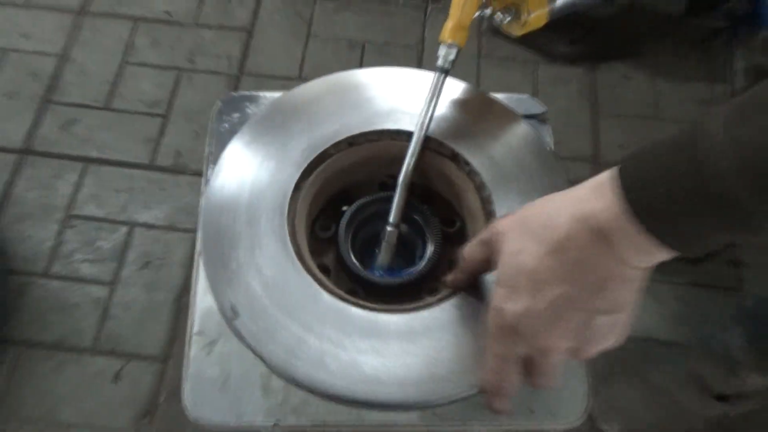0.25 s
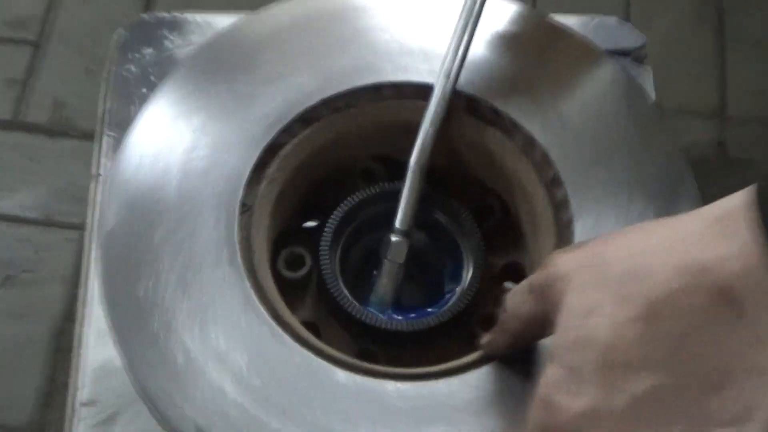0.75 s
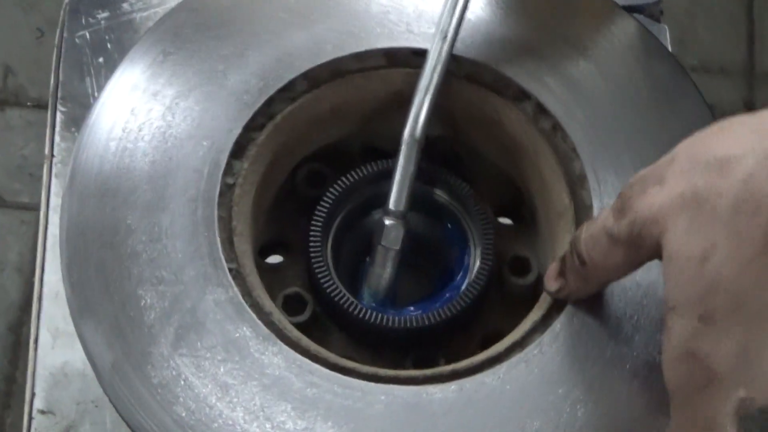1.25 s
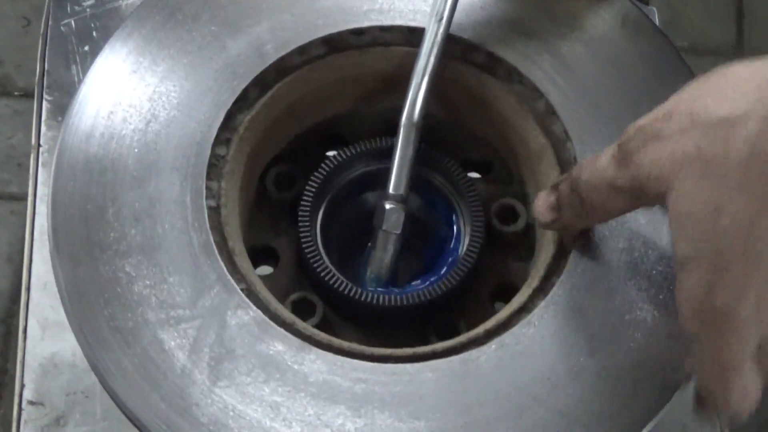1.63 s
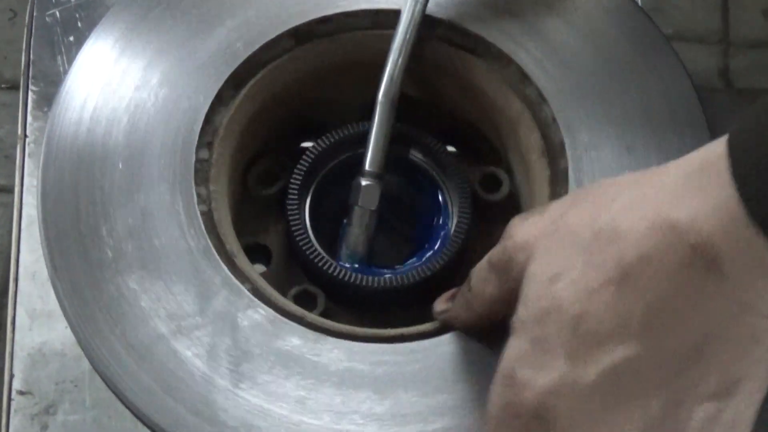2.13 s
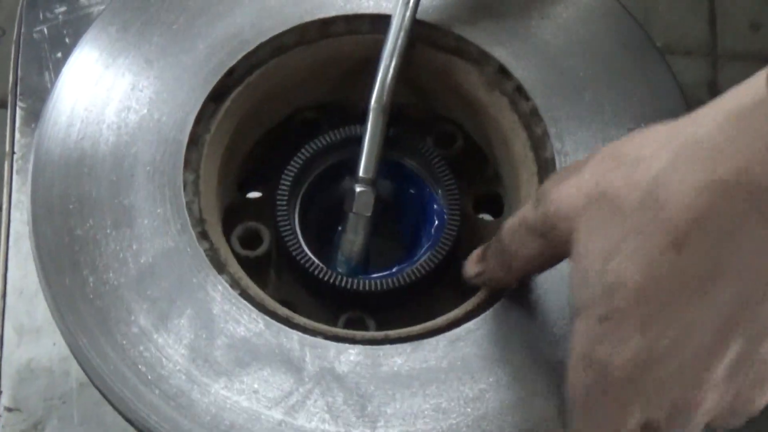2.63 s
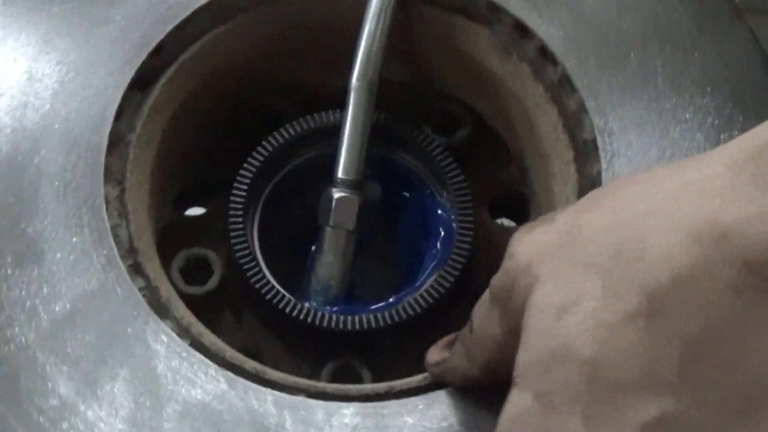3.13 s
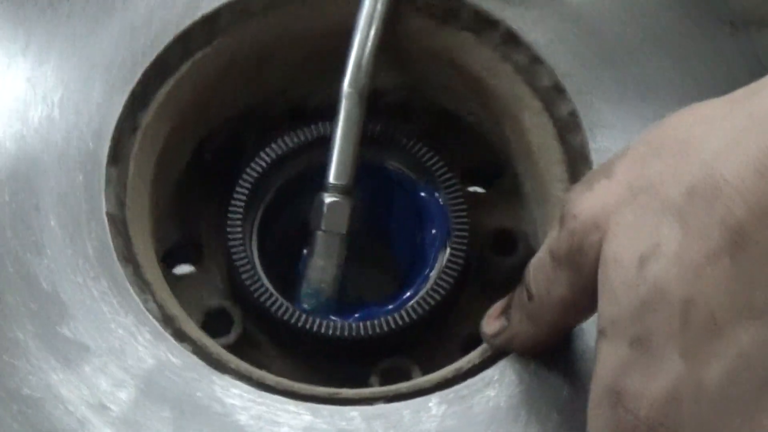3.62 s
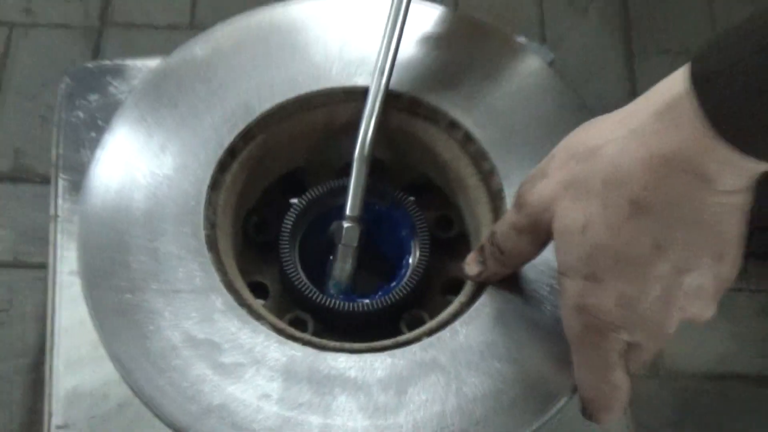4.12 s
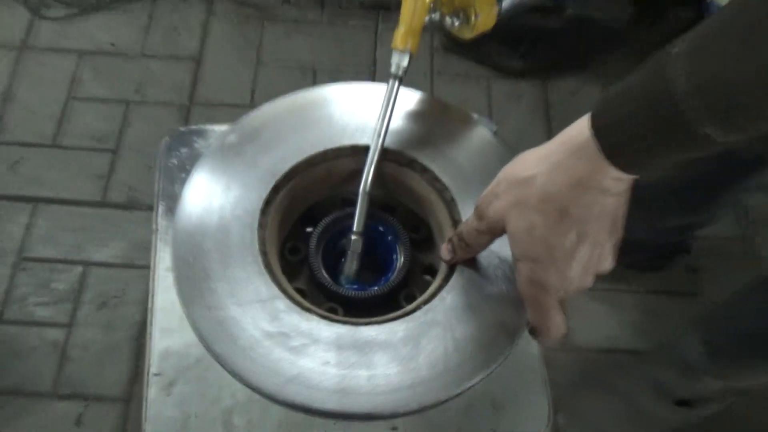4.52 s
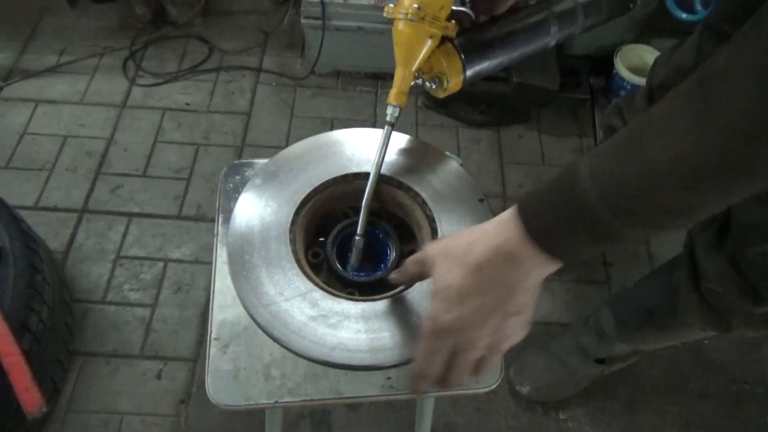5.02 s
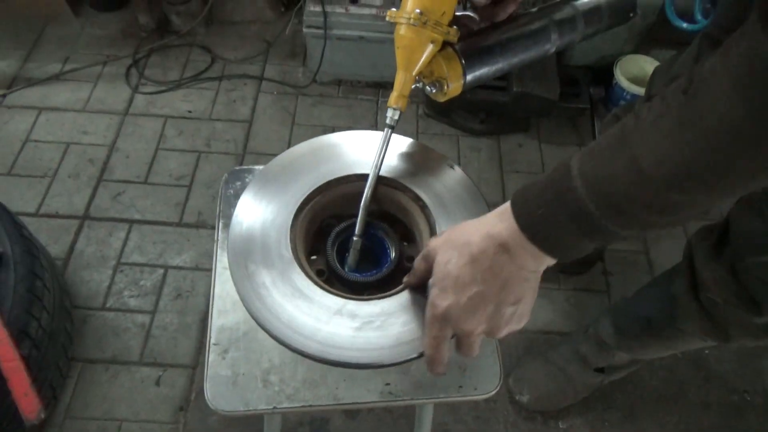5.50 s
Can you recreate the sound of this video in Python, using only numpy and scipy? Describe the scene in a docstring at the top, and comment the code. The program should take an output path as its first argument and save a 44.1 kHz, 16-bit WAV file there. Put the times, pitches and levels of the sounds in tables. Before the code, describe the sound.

Quick hissing bursts of compressed air from a grease gun, each ending in a thin whistle, with squelching grease and knocks in a small workshop.

```python
"""A hand-held grease gun, apparently air-driven, packs a wheel bearing in a small workshop, over a faint hush.
Each stroke spurts, hisses as the piston travels, barks as it turns and narrows to a whistle as the valve shuts:
shaped noise through resonances. Grease squelches and the valve squeaks at first; light strokes follow.
In a pause a hand rubs the disc and a thin metallic sing is heard. Light and loaded strokes then mix; late on,
air seeps and hard knocks fall. The room rings after each stroke; a peak limiter holds the loudest bursts."""
import sys
import numpy as np
from scipy import signal
from scipy.fft import rfft, irfft, next_fast_len
from scipy.io import wavfile
from scipy.ndimage import uniform_filter1d, minimum_filter1d

SR = 44100
rng = np.random.default_rng(int(sys.argv[2]) if len(sys.argv) > 2 else 0)


def unload_audio(sound):
    """Save the sound as a 16-bit wav file, at the path given as the first command line argument."""
    columns = np.transpose(np.atleast_2d(sound))
    # keep every value between -1 and 1, then stretch to whole-number steps
    steps = np.round(np.clip(columns, -1, 1) * 32767)
    wavfile.write(sys.argv[1], SR, steps.astype(np.int16))


N = 253778
LEAD = SR // 2  # half a second of lead-in, so that an earlier stroke is still dying away at the start
TIME = np.arange(-LEAD, N) / SR
SIZE = next_fast_len(len(TIME) + SR)
FREQ = np.maximum(np.arange(SIZE // 2 + 1) * SR / SIZE, 1)

# strokes: valve_opens_s, piston_turns_s, valve_shuts_s, valve_lift_s, load (0-1), exhaust_bark_db
STROKES = [(-.28, -.140, .005, .010, 1, -13), (.059, .175, .280, .008, .4, -12),
           (.399, .546, .590, .003, 0, -21.5), (.756, .915, .964, .005, 0, -23),
           (1.089, 1.253, 1.300, .005, 0, -23), (1.846, 1.982, 2.121, .008, 1, -13.5),
           (2.248, 2.418, 2.468, .007, 0, -23.5), (2.856, 2.985, 3.112, .012, 1, -11.5),
           (3.435, 3.592, 3.652, .012, 0, -26.5), (3.849, 4.020, 4.073, .011, 0, -23),
           (4.232, 4.379, 4.520, .008, 1, -14.5), (4.802, 4.946, 5.086, .012, 1, -14),
           (5.362, 5.511, 5.660, .016, 1, -11.5), (5.694, 5.840, 5.980, .012, 1, -13)]
# spurt time after the valve has lifted: free_s, loaded_s
SPURT_AFTER_LIFT_S = (.025, .0275)
# colour of the closing valve: freq_hz, density_db (per Hz, relative)
CLOSING_COLOUR = [(100, -43), (600, -30), (2500, -19), (5000, -17), (7000, -11), (7800, -4), (10000, -2.5),
                  (11500, -8), (16000, -21)]
# resonances of the gun's body: freq_hz, width_hz, lift_db
BODY_MODES = [(654, 38, 5), (718, 25, 4), (791, 30, 6), (1000, 35, 3), (1203, 30, 2), (1302, 43, 5),
              (1611, 35, 3), (1707, 60, 4), (2010, 35, 4), (2128, 25, 3), (2547, 65, 3), (2760, 150, 3),
              (3230, 40, 3), (3464, 45, 4), (4114, 50, 3)]


def from_db(db):
    """Decibels to gain."""
    return 10 ** (np.asarray(db) / 20)


def rms_one(x):
    """Scale to an rms of 1."""
    return x / np.sqrt(np.mean(x ** 2) + 1e-20)


def at_hz(points, hz):
    """Read a (Hz, value) table on a log-frequency axis."""
    known_hz, value = np.transpose(points)
    return np.interp(np.log(hz), np.log(known_hz), value)


def under(load, pair):
    """Blend from the free-running value to the fully loaded one."""
    return np.interp(load, [0, 1], pair)


def ramp(start_s, length_s):
    """Rises from 0 to 1 over the given time."""
    return np.clip((TIME - start_s) / max(length_s, 1e-4), 0, 1)


def envelope(start_s, db, rise_s, hold_s, fall_db_per_s):
    """Gain that rises, holds and dies away."""
    falling_s = np.clip(TIME - start_s - rise_s - hold_s, 0, 1)
    return ramp(start_s, rise_s) * from_db(db - fall_db_per_s * falling_s)


def flutter(rate_hz, depth_rms_db):
    """A gain that wanders at random, from low-passed noise."""
    lowpass = signal.butter(2, rate_hz, fs=SR, output="sos")
    slow = signal.sosfilt(lowpass, rng.standard_normal(len(TIME)))
    return from_db(depth_rms_db * rms_one(slow))


def air(colour, modes=()):
    """Turbulence with a broad colour, lifted at the resonances that it passes; rms 1."""
    db = at_hz(colour, FREQ)
    for hz, width_hz, lift_db in modes:
        db = db + lift_db / (1 + (2 * (FREQ - hz) / width_hz) ** 2)
    spectrum = rfft(rng.standard_normal(SIZE)) * from_db(db)
    return rms_one(irfft(spectrum, SIZE)[:len(TIME)])


def strokes(spurt_fall_s=.007, shut_s=.006, swell_db=3.5, turn_s=.002, stall=.34):
    """Spurt, drive and return of every stroke, as power shares of an open, a choked and a closing jet."""
    # jet colours: freq_hz, density_db (per Hz, relative)
    open_colour = [(40, -48), (110, -46), (200, -33), (700, -25), (1600, -18), (3300, -15), (4600, -8.5),
                   (7000, -5.5), (9400, 0), (11500, -4), (14000, -7), (15800, -10.5)]
    choked_colour = [(40, -44), (110, -42), (200, -32), (700, -24), (1100, -25.5), (1700, -21), (3000, -19),
                     (5200, -12), (7300, -8.5), (9800, -2), (12000, -5), (14000, -5.5), (15800, -13.5)]
    # air passage resonances: freq_hz, width_hz, lift_db
    port_modes = [(4700, 400, 2), (6420, 400, 3), (8000, 400, 2), (9400, 1500, 1.5), (12300, 300, 2)]
    choke_modes = [(6400, 700, 2), (9650, 900, 2.5), (13800, 1200, 1)]
    whistle_modes = [(7800, 550, 4), (8750, 400, -4), (9600, 650, 4), (10800, 200, 2), (12400, 300, 3)]
    # phase levels, return from first to last: free_db, loaded_db
    spurt_db = (-8.4, -7.4)
    drive_db = (-10.7, -15.4)
    return_db = (-11.8, -10.1)
    last_db = (-16.5, -23)

    wide, choked, closing = np.zeros((3, len(TIME)))
    for opens, turns, shuts, lift_s, load, _ in STROKES:
        spurt_s = lift_s + under(load, SPURT_AFTER_LIFT_S)
        opened = ramp(opens, lift_s) ** 1.2
        spent = ramp(opens + spurt_s - spurt_fall_s / 2, spurt_fall_s)
        turned = ramp(turns, turn_s)
        shut = ramp(shuts - shut_s / 2, shut_s)

        # against a load the jet is thinner and swells in the middle of the piston's travel
        travel = ramp(opens + spurt_s, turns - opens - spurt_s)
        swell = swell_db * load * (np.sin(np.pi * travel ** 1.5) - .5)
        drive = from_db(under(load, drive_db) + swell) * spent * (1 - turned)
        drive *= 1 - stall * ramp(turns - .012, .008)  # the flow sags as the piston stalls

        # on the way back the pressure sinks and the gap narrows to a whistle
        back = ramp(turns, shuts - turns)
        sunk, narrow = back ** 2.6, back ** 1.2
        leaving_db = (1 - sunk) * under(load, return_db) + sunk * under(load, last_db)
        leaving = from_db(leaving_db) * turned * (1 - shut)

        # the gap is still narrow as the valve lifts, so the treble comes first
        spurt = from_db(under(load, spurt_db)) * opened * (1 - spent)
        gap = ramp(opens, 1.2 * lift_s) ** 2

        wide += gap * spurt ** 2 + (1 - load) * drive ** 2 + (1 - narrow) * leaving ** 2
        choked += load * drive ** 2
        closing += narrow * leaving ** 2 + (1 - gap) * spurt ** 2
    jets = np.sqrt(wide) * air(open_colour, port_modes)
    jets += np.sqrt(choked) * air(choked_colour, choke_modes)
    jets += np.sqrt(closing) * air(CLOSING_COLOUR, whistle_modes)
    return jets * flutter(rate_hz=150, depth_rms_db=.7)


def shifting(x, width_hz=1000):
    """The jet's colour shifts as its gap moves: each treble band swells and sinks on its own."""
    # band centres: freq_hz
    bands_hz = [6900, 8200, 9200, 10300, 11500, 13400]
    shifted = x
    for hz in bands_hz:
        band = signal.lfilter(*signal.iirpeak(hz, hz / width_hz, fs=SR), x)
        shifted = shifted + band * (flutter(rate_hz=18, depth_rms_db=1.7) - 1)
    return shifted


def barks(rise_s=.0015, spurt_body_db=-30):
    """At each turn spent air bursts through the gun's body, longer under load; spurts stir it a little."""
    # exhaust: freq_hz, density_db (per Hz, relative)
    exhaust_colour = [(40, -35), (120, -33), (300, -19.5), (600, -13), (1000, -6.5), (1600, -1),
                      (2800, -1.5), (4500, -4.5), (7500, -5.5), (16000, -17)]
    # bark hold: free_s, loaded_s
    bark_hold_s = (.011, .020)
    # bark fall: free_db_per_s, loaded_db_per_s
    bark_fall_db_per_s = (600, 450)

    power = np.zeros(len(TIME))
    for opens, turns, _, lift_s, load, bark_db in STROKES:
        bark = envelope(turns, bark_db, rise_s, under(load, bark_hold_s), under(load, bark_fall_db_per_s))
        spent = ramp(opens + lift_s + under(load, SPURT_AFTER_LIFT_S), lift_s)
        stirred = from_db(spurt_body_db) * ramp(opens, 2 * lift_s) * (1 - spent)
        power += bark ** 2 + stirred ** 2
    return np.sqrt(power) * air(exhaust_colour, BODY_MODES) * flutter(rate_hz=250, depth_rms_db=2.0)


def knocks(decay_s=.0025, stop_lag_s=.005, stop_over_bark_db=6, stop_hz=2000):
    """The piston's stop, stray knocks, and valve clicks as some spurts end: a decaying body rattle and ringing
    steel."""
    # stray knocks, and valve clicks at the end of some spurts: start_s, level_db, lowpass_hz
    other_knocks = [(1.455, -45, 4000), (1.517, -48, 12000), (1.870, -16, 12000), (3.385, -53, 12000),
                    (4.259, -20, 6000), (5.280, -34, 3000), (5.289, -32, 3000), (5.398, -12, 4000),
                    (5.725, -9, 5000)]
    # ringing steel: freq_hz, level_db, t60_s
    steel_modes = [(877, -26, .13), (1380, -22, .08), (1960, -25, .2), (2845, -12, .05)]

    # with no load to brake it the piston hits its stop, the harder the louder it barks
    stops = [(turns + stop_lag_s, bark_db + stop_over_bark_db, stop_hz)
             for _, turns, _, _, load, bark_db in STROKES if load < .5]
    rattle = air([(60, -36), (300, -16), (900, 0), (16000, -3)], BODY_MODES)
    out = np.zeros(len(TIME))
    for start_s, level_db, lowpass_hz in stops + other_knocks:
        age_s = np.clip(TIME - start_s, 0, 1)
        strike = rattle * (TIME >= start_s) * np.exp(-np.minimum(age_s / decay_s, 20))
        for hz, mode_db, t60_s in steel_modes:
            strike += from_db(mode_db - 60 * age_s / t60_s) * np.sin(2 * np.pi * hz * age_s)
        out += from_db(level_db) * signal.lfilter(*signal.butter(1, lowpass_hz, fs=SR), strike)
    return out


def squeak():
    """A brief whistle at the opening valve's seat: noise through one narrow resonance."""
    # squeak: start_s, length_s, pitch_hz, width_hz, level_db
    start_s, length_s, hz, width_hz, level_db = (.060, .014, 11400, 900, -8)
    tone = signal.lfilter(*signal.iirpeak(hz, hz / width_hz, fs=SR), rng.standard_normal(len(TIME)))
    gate = ramp(start_s, .002) * (1 - ramp(start_s + length_s / 2, length_s))
    return from_db(level_db) * rms_one(tone) * gate


def seep():
    """Trapped air leaks past the closed valve and whistles thinly."""
    # leak: start_s, level_db, rise_s, hold_s, fall_db_per_s
    leak = (5.07, -47, .05, .19, 350)
    # whistle: freq_hz, width_hz, lift_db
    seep_modes = [(6900, 300, 7), (7900, 550, 9), (9700, 1500, -5), (11300, 300, 8), (12400, 300, 5),
                  (15400, 400, 6)]
    return envelope(*leak) * air(CLOSING_COLOUR, seep_modes)


def squelch():
    """Grease and air sputter through the bearing's cavity: fluttering resonant noise."""
    # pops and sputters: start_s, level_db, rise_s, hold_s, fall_db_per_s
    bursts = [(-.12, -29, .02, .13, 130), (.073, -18.5, .006, .028, 450), (.11, -29, .02, .165, 150)]
    # grease: freq_hz, density_db (per Hz, relative)
    grease_colour = [(300, -26), (1000, -7), (1400, -3), (2000, -1), (3000, -1), (4500, -7), (12000, -18)]
    # cavity: freq_hz, width_hz, lift_db
    cavity_modes = [(1070, 90, 4), (1350, 120, 8), (2720, 240, 9)]
    level = sum(envelope(*burst) for burst in bursts)
    return level * air(grease_colour, cavity_modes) * flutter(rate_hz=120, depth_rms_db=2)


def rub():
    """A hand slides unevenly over the steel disc: faint noise with a slow flutter."""
    # slide: start_s, level_db, rise_s, hold_s, fall_db_per_s
    slide = (1.41, -59, .05, .03, 62)
    # skin on steel: freq_hz, density_db (per Hz, relative)
    skin_colour = [(200, -8), (800, 0), (1500, 0), (3000, -8), (4500, -5), (9500, -8), (15000, -22)]
    return envelope(*slide) * air(skin_colour, BODY_MODES) * flutter(rate_hz=30, depth_rms_db=2.5)


def sing():
    """Thin metallic partials swell and fade together, each with its own flutter."""
    # swell: start_s, length_s, level_db
    start_s, length_s, level_db = (1.60, .11, -70)
    # partials: freq_hz, level_db (relative)
    partials = [(3150, -5), (4100, -4), (4450, 0), (8300, -1), (9600, -1), (10850, -6), (12050, -8)]
    tone = np.zeros(len(TIME))
    for hz, partial_db in partials:
        sine = np.sin(2 * np.pi * hz * TIME)
        tone += from_db(partial_db) * sine * flutter(rate_hz=40, depth_rms_db=3)
    gate = ramp(start_s, length_s / 3) * (1 - ramp(start_s + length_s / 2, length_s / 2))
    return from_db(level_db) * rms_one(tone) * gate


def workshop(x, first_echo_s=.004, likeness=.8):
    """Direct sound, near reflections and a diffuse stereo tail that dies sooner in the treble."""
    # decay: freq_hz, t60_s
    room_t60 = [(150, .45), (530, .48), (1400, .45), (3700, .355), (9000, .25), (12500, .23), (16000, .2)]
    # tail against direct sound: freq_hz, level_db
    room_level = [(150, -3), (600, -4.5), (1400, -6.5), (4000, -8), (7500, -11), (10000, -11.5),
                  (15000, -13)]
    # disc reflections, opposite in the two channels, against direct sound: freq_hz, level_db
    near_side = [(100, -13), (700, -13), (2000, -14.5), (4000, -17.5), (7000, -15.5), (10000, -18),
                 (13000, -24)]
    # left minus right: freq_hz, difference_db
    balance_db = [(200, -.5), (1500, 0), (5000, -1.1), (9000, -1.7), (14000, -.7)]

    t = np.arange(SR * 3 // 4) / SR
    opposite = np.array([[1], [-1]])
    edges_hz = np.geomspace(60, 18000, 25)
    tail = 0
    for low, high in zip(edges_hz, edges_hz[1:]):
        hz = np.sqrt(low * high)
        decay = from_db(-60 * t / at_hz(room_t60, hz)) * (t > first_echo_s)
        bandpass = signal.butter(2, [low, high], "band", fs=SR, output="sos")
        mid, side = signal.sosfilt(bandpass, rng.standard_normal((2, len(t))))
        pair = np.sqrt((1 + likeness) / 2) * mid + np.sqrt((1 - likeness) / 2) * side * opposite
        tail = tail + pair * decay / np.sqrt(np.sum(decay ** 2)) * from_db(at_hz(room_level, hz))

    near = rng.standard_normal(len(t)) * (t < 2 * first_echo_s)
    near /= np.sqrt(np.sum(near ** 2))
    near_response = rfft(near, SIZE) * from_db(at_hz(near_side, FREQ)) * opposite
    balance = from_db(at_hz(balance_db, FREQ) * opposite / 2)
    response = (1 + near_response + rfft(tail, SIZE)) * balance
    return irfft(rfft(x, SIZE) * response, SIZE)[:, :len(TIME)]


def room_hush(level_db=-64, side_db=-18):
    """Steady low-weighted noise, nearly alike in both channels."""
    # hush: freq_hz, density_db (per Hz, relative)
    hush_colour = [(30, -27), (60, -18), (120, -5), (190, 1), (400, 0), (800, -5), (2000, -10), (4000, -16),
                   (9000, -23), (15000, -30)]
    side = from_db(side_db) * air(hush_colour) * [[1], [-1]]
    return from_db(level_db) * (air(hush_colour) + side)


def scene():
    """The gun and the bearing in the workshop, over a faint hush."""
    gun = shifting(strokes()) + barks() + knocks() + squeak() + seep()
    bearing = squelch() + rub() + sing()
    return (workshop(gun + bearing) + room_hush())[:, LEAD:]


def record(dry, ceiling=1.2, release_db_per_s=500, top=1.0, cutoff_hz=15850):
    """A look-ahead limiter eases the loudest bursts, remaining peaks are rounded, the treble is cut."""
    over_db = 20 * np.log10(np.maximum(np.abs(dry).max(axis=0) / ceiling, 1))
    recovery_db = release_db_per_s * np.arange(N) / SR
    cut_db = np.maximum.accumulate(over_db + recovery_db) - recovery_db
    # 45 samples: the cut starts ahead of the peak and is smoothed
    gain_db = uniform_filter1d(minimum_filter1d(-cut_db, size=45), size=45)
    held = dry * from_db(gain_db)
    rounded = held / (1 + (held / top) ** 8) ** (1 / 8)
    lowpass = signal.ellip(12, .1, 70, cutoff_hz, fs=SR, output="sos")
    return signal.sosfilt(lowpass, rounded)


dry = scene()
out = record(dry)
unload_audio(out)
```